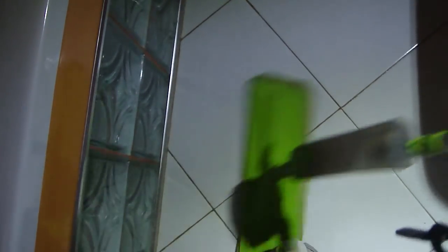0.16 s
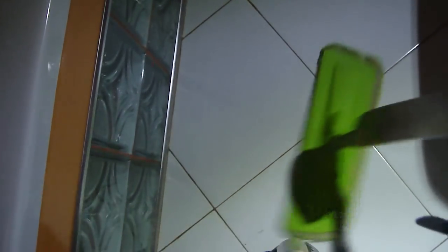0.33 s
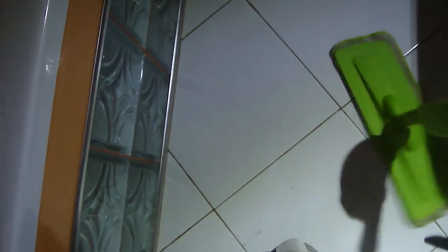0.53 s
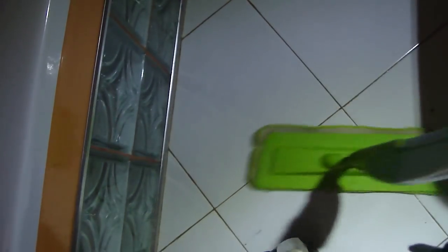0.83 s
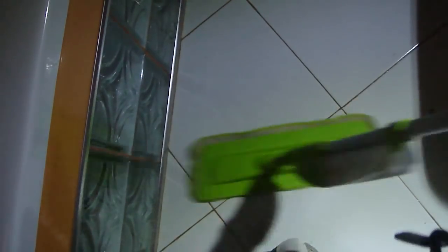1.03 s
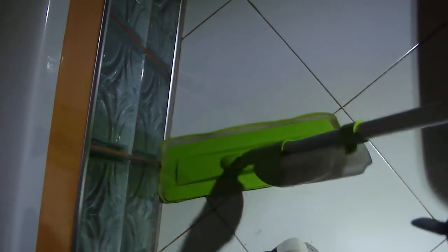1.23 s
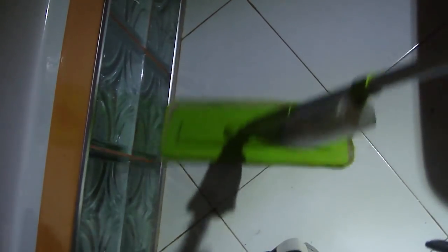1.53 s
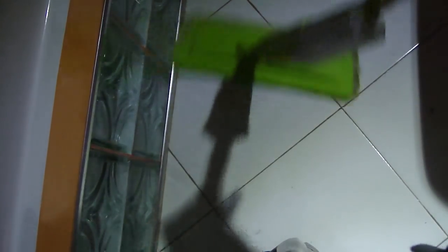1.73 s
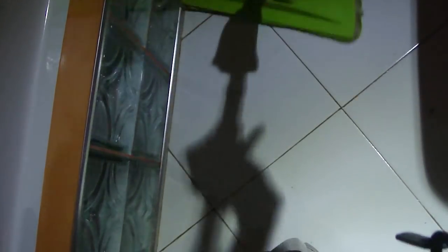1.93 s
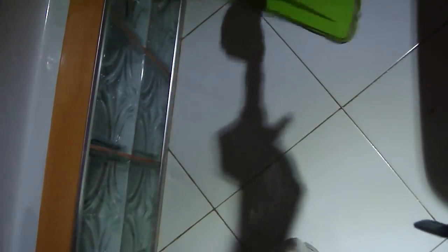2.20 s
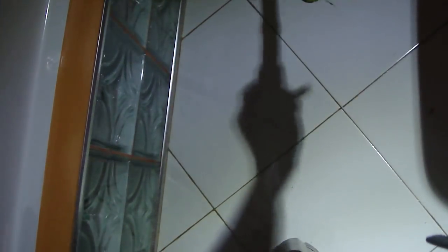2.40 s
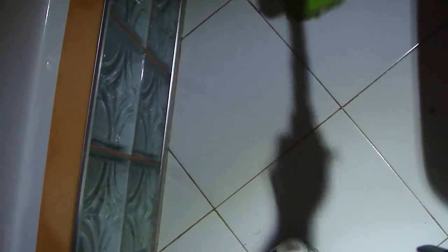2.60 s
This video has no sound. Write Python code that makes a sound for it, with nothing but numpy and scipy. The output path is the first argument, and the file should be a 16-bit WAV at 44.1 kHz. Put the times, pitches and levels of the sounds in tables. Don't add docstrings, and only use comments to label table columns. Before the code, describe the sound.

A flat plastic mop head knocks and swishes across floor tiles in a small hard room

```python
import sys
import numpy as np
from scipy import signal
from scipy.fft import rfft, irfft, next_fast_len
from scipy.io import wavfile
from scipy.ndimage import uniform_filter1d, map_coordinates

SR = 44100
rng = np.random.default_rng(int(sys.argv[2]) if len(sys.argv) > 2 else 0)


def transcribe(u):
    v = np.clip(np.atleast_2d(u).T, -1, 1)
    q = np.round(v * 32767).astype(np.int16)
    wavfile.write(sys.argv[1], SR, q)


def volts(x):
    e = np.asarray(x, float) / 20
    return 10 ** e


N = 121275


def unit(x):
    return x / np.sqrt(np.mean(x ** 2) + 1e-20)


def along(points, hz):
    f, v = np.transpose(points)
    return np.interp(np.log(hz + 1), np.log(f + 1), v)


def wobble(rate):
    knots = rng.standard_normal(int(N * rate / SR) + 4)
    return map_coordinates(knots, [np.arange(N) * rate / SR])


def filtered(x, response):
    m = next_fast_len(len(x) + 8192)
    return irfft(rfft(x, m) * response(np.fft.rfftfreq(m, 1 / SR)), m)[:len(x)]


def causal(gain, size=4096):
    cepstrum = irfft(np.log(np.abs(gain(np.fft.rfftfreq(size, 1 / SR))) + 1e-6), size)
    cepstrum[1:size // 2] *= 2
    cepstrum[size // 2 + 1:] = 0
    return irfft(np.exp(rfft(cepstrum)), size)


def patchy(patchy_db):
    z = signal.stft(rng.standard_normal(N), nperseg=512)[2]
    field = uniform_filter1d(rng.standard_normal(z.shape), 6, 0)
    field = uniform_filter1d(field, 10, 1)
    return signal.istft(z * volts(patchy_db * unit(field)), nperseg=512)[1][:N]


def knock(strength_db, pitch_hz, tilt_db, direct_db, ring_q, ring_db, thin_db):
    # hz, level_db (per Hz)
    crack = [(35, -56), (60, -24), (107, -23), (292, -7), (533, -6), (750, -4), (1130, -7.5), (1520, -4),
             (10000, -31), (13000, -38), (22000, -120)]
    rattle_s, rattle_db, scatter_db = 0.0046, -12.5, 1
    t = np.arange(SR // 10) / SR
    hits = volts(rattle_db + scatter_db * rng.standard_normal(len(t))) * rng.standard_normal(len(t))
    hits *= np.exp(-t / rattle_s)
    hits[0] = 1

    def head_gain(f):
        ring = 1 + volts(ring_db) / np.hypot(1, ring_q * (f / pitch_hz - pitch_hz / (f + 1)))
        treble_db = tilt_db * np.log2(np.maximum(f / 1000, 1))
        bass_cut_db = thin_db * np.log2(np.maximum(0.79 * pitch_hz / (f + 1), 1))
        return volts(along(crack, f) + treble_db - bass_cut_db) * ring

    body = causal(head_gain)
    direct = signal.fftconvolve(hits, body)
    sound = signal.fftconvolve(body / np.linalg.norm(body), room())
    sound[:len(direct)] += volts(0.5 + direct_db) * direct / np.linalg.norm(direct)
    return 5.18 * volts(strength_db) * sound


def knocks():
    blow_at = [.1862, .2669, 1.1606, 1.1637, 1.1678, 2.4103, 2.414, .1925, .202, 2.4165]
    blows = [
        (4, 754, -3.5, 2),
        (-9.5, 1150, -0.5, 1.5),
        (-5.5, 2500, -1, 2.5),
        (-11, 2100, 2.5, -2),
        (0, 850, 3, 2.5),
        (-16.5, 790, -4.5, 4.5),
        (-4.5, 1210, 2.5, 5.5),
        (-3, 1860, -3.5, 0.5),
        (-4.5, 295, -4, -1),
        (-5.5, 570, -4.5, 5.5),
    ]
    tap_at = [.004, .017, .02, .1165, .126, .5273, .5398, .552, .8389, 1.1423, 1.756, 1.772, 1.983, 1.996,
              2.2115, 2.2419, 2.266, 2.2738, 2.632, 2.7143, .8535, 2.284, 1.713]
    taps = [(-17, 790, 0.5, 5.5), (-19, 830, 2.5, -2), (-20, 172, -11, 5.5), (-15, 550, 0, 6.5),
            (-20.5, 724, -16, 13), (-12.5, 660, -3.5, -6.5), (-23, 540, -2, -3), (-27.5, 780, -4.5, 8),
            (-13.5, 1010, 1.5, 4.5), (-22, 3600, -2, 7), (-15, 1340, -6.5, 2.5), (-16.5, 640, -6, 4.5),
            (-24, 770, -10, 8), (-24, 930, -23, 2), (-25.5, 730, -5, 0), (-25.5, 660, -9, 7),
            (-23.5, 720, -11, 9), (-16.5, 690, -5, 9.5), (-17, 670, 0, 2.5), (-21.5, 890, -13, 5),
            (-27, 960, -7, 12), (-19.5, 790, -11.5, 5), (-21.5, 790, -8, -1.5)]
    events = [(s, knock(*row, ring_q=6, ring_db=5.5, thin_db=0)) for s, row in zip(blow_at, blows)]
    events += [(s, knock(*row, ring_q=2.6, ring_db=16.5, thin_db=8)) for s, row in zip(tap_at, taps)]
    out = np.zeros(N + 2 * SR)
    for start_s, sound in events:
        out[round(start_s * SR):][:len(sound)] += sound
    return out[:N]


def scuffs():
    scuff_at = [1.71, 1.766, 1.891, 2.185, .578, 1.153, 2.401]
    # strength_db, length_s
    catches = [
        (-22.5, 0.019),
        (-26, .035),
        (-20.5, 0.012),
        (-32, 0.023),
        (-34, 0.022),
        (-33, .008),
        (-24, 0.015),
    ]
    # hz, level_db (per Hz)
    rasp_colour = [(150, -47), (400, -1), (800, 3.5), (1900, -1), (3700, -5), (8000, -10.5), (10500, -12.5),
                   (14000, -56)]
    rise_s = .007
    t = np.arange(N) / SR
    shape = np.zeros(N)
    for start_s, (db, length_s) in zip(scuff_at, catches):
        rise = np.clip((t - start_s) / rise_s, 0, 1)
        shape += volts(db) * rise * np.exp(-(np.maximum(t - start_s, 0) / length_s) ** 2)
    rasp = unit(filtered(patchy(0.92), lambda f: volts(along(rasp_colour, f))))
    direct = shape * rasp
    return direct + volts(-6.5) * signal.fftconvolve(direct, room())[:N]


def swish():
    # time_s, friction_db
    slide = [(0, -43), (.35, -39), (.5, -40.5), (.62, -45), (.7, -46.5), (1.0, -41.5), (1.12, -40),
             (1.38, -43.5), (1.55, -40.5), (1.681, -35), (1.84, -35), (1.92, -35), (1.99, -54.5),
             (2.12, -49), (2.198, -37.5), (2.38, -43), (2.55, -43), (2.75, -44)]
    # hz, level_db (per Hz)
    cloth = [(150, -48), (250, -15.5), (887, 1), (1210, -9), (3200, -10), (3630, -14), (7920, -19.5),
             (10500, -20.5), (13600, -50), (22000, -120)]
    fibres_per_s, stroke_contrast, cloth_db, drag_db = 2100, 1.63, 3.5, 1.0
    s, db = np.transpose(slide)
    level_db = np.interp(np.arange(N) / SR, s, stroke_contrast * (db - db.max()) + db.max())
    caught = rng.random(N) < fibres_per_s / SR
    grains = caught * rng.standard_normal(N) * volts(1.0 * rng.standard_normal(N))
    friction = patchy(1.5) + .5 * unit(grains)
    rub = unit(filtered(friction, lambda f: volts(along(cloth, f))))
    return rub * volts(level_db + cloth_db + drag_db * wobble(26.65))


def room():
    # hz, t60_s
    decay = [(60, 0.081), (150, 0.36), (400, 0.41), (1000, 0.37), (2800, 0.32), (7000, 0.27)]
    room_db, wall_s, build_s = 7.0, .003, .003
    near_db, near_t60_s = -13.5, 0.03
    echo_db, echoes_per_s = 1.6, 300
    hz, t, z = signal.stft(rng.standard_normal(SR), SR, nperseg=256)
    fall = volts(-60 * t / along(decay, hz)[:, None]) + volts(near_db - 60 * t / near_t60_s)
    tail = signal.istft(z * fall, SR, nperseg=256)[1]
    tail = tail * (1 - np.exp(-np.arange(len(tail)) / SR / build_s))
    tail = tail * volts(echo_db * wobble(echoes_per_s)[:len(tail)])
    return np.pad(volts(room_db) * tail / np.linalg.norm(tail), (round(wall_s * SR), 0))


def house():
    # hz, level_db (per Hz)
    hum_colour = [(15, -80), (25, -43), (179, -7), (383, -6.5), (446, -6.5), (574, 0.5), (818, -5.5),
                  (3120, -9), (10500, -27), (13600, -67), (22000, -120)]
    hum = unit(filtered(patchy(0.67), lambda f: volts(along(hum_colour, f))))
    return volts(-36.5 + 0.33 * wobble(8.8)) * hum


def scene():
    return (knocks() + scuffs() + swish() + house())[None]


def top_cut(x):
    return signal.sosfilt(signal.butter(12, 16350, fs=SR, output="sos"), x)


def record(dry):
    top_hz, steepness, gain_s, lift_db, hardness = 9750, 20, 0.75, 0.5, 24
    x = filtered(dry[0], lambda f: 1 / np.sqrt(1 + (f / top_hz) ** (2 * steepness)) * (f < 11000))
    keep = np.exp(-1 / (gain_s * SR))
    loud = signal.lfilter([1 - keep], [1, -keep], np.abs(x))
    x = x * volts(lift_db * loud / 0.15)
    x = x / (1 + np.abs(x) ** hardness) ** (1 / hardness)
    mix = filtered(x, lambda f: f < 15800)[None]
    return top_cut(mix)


dry = scene()
out = record(dry)
transcribe(out)
```